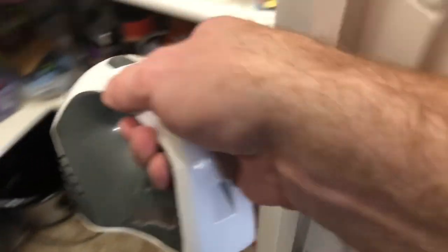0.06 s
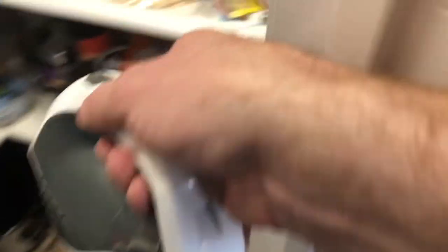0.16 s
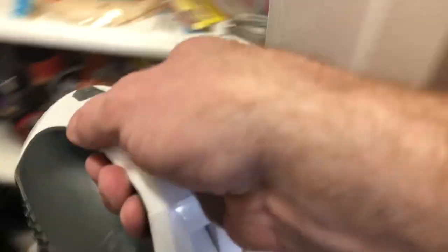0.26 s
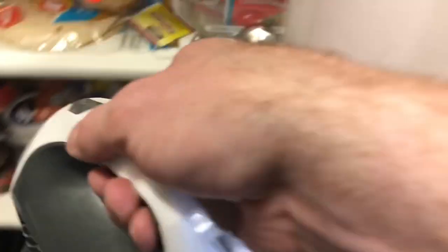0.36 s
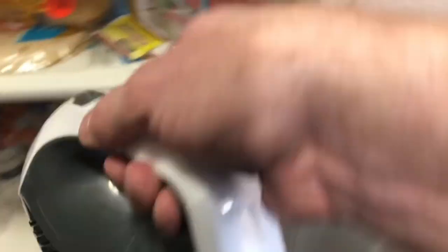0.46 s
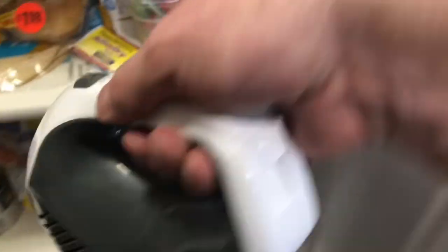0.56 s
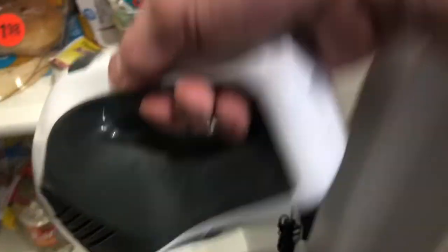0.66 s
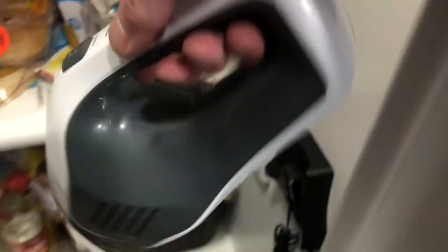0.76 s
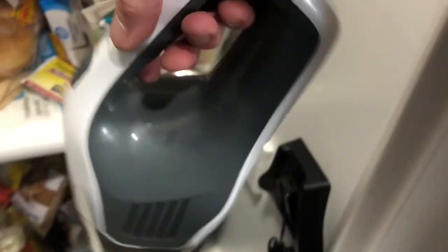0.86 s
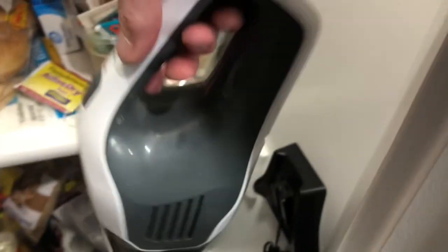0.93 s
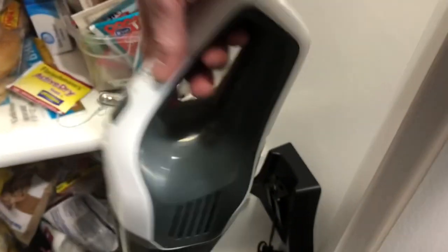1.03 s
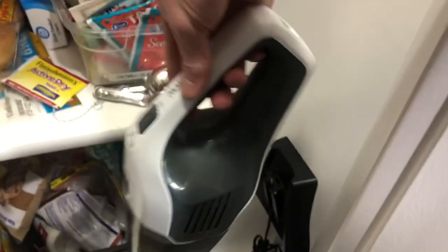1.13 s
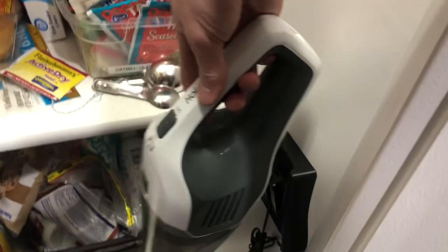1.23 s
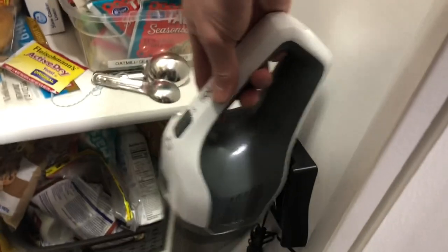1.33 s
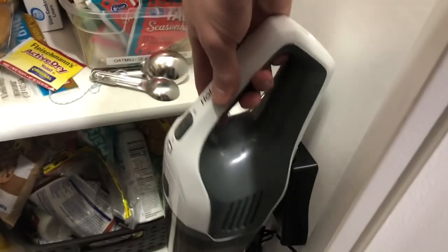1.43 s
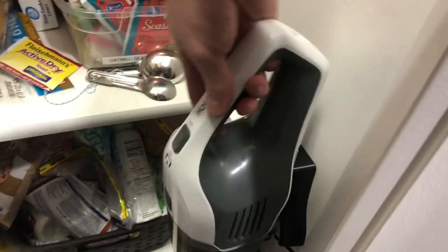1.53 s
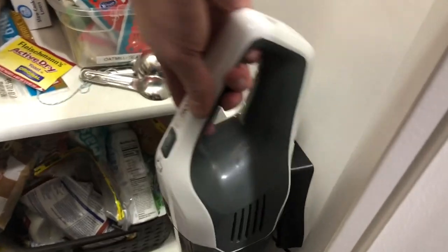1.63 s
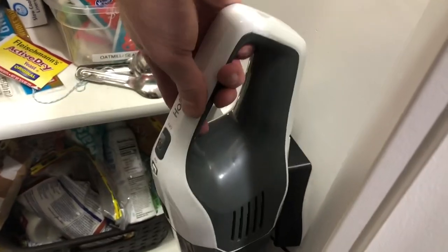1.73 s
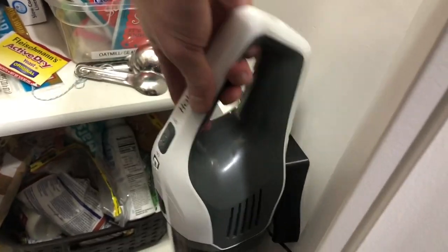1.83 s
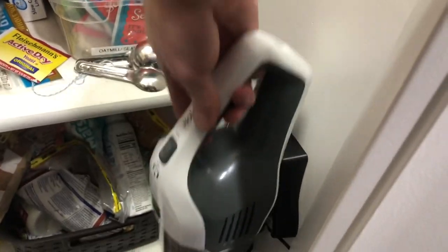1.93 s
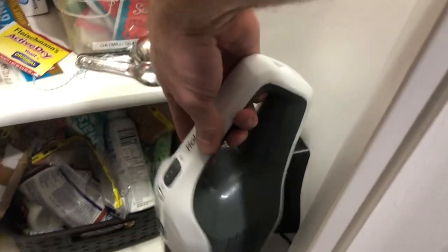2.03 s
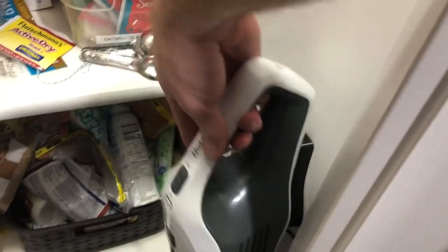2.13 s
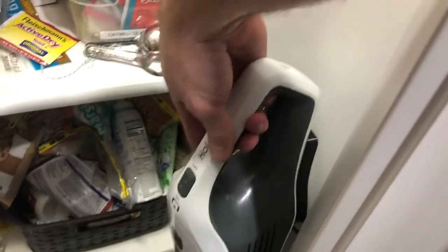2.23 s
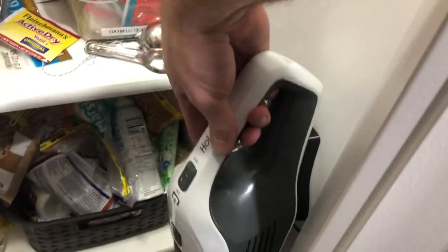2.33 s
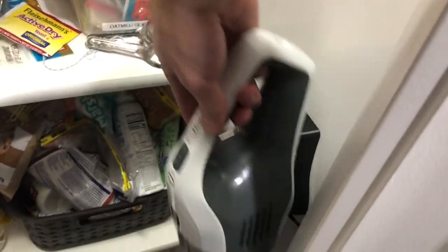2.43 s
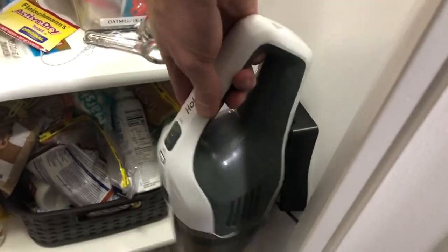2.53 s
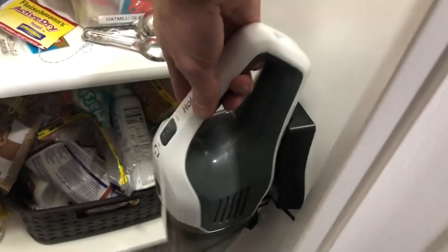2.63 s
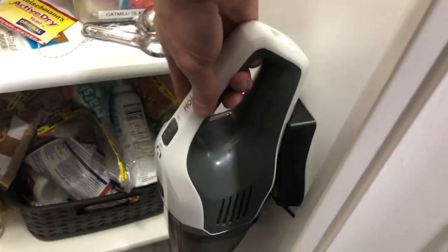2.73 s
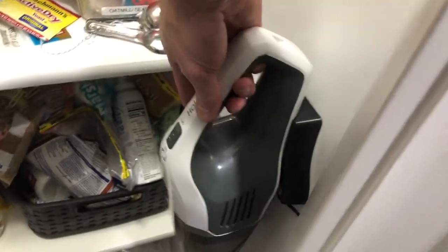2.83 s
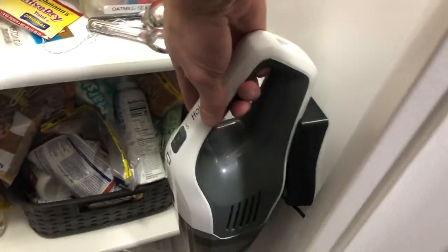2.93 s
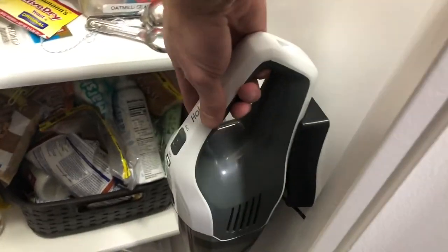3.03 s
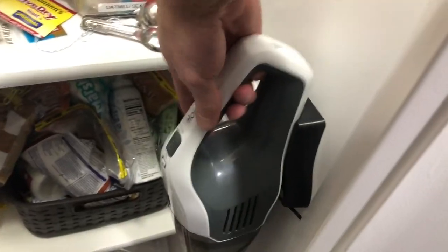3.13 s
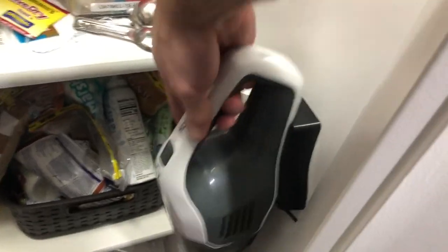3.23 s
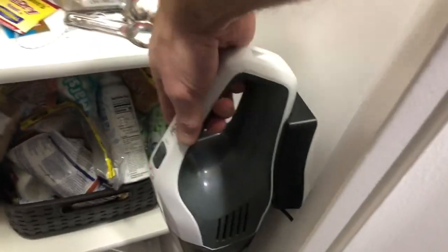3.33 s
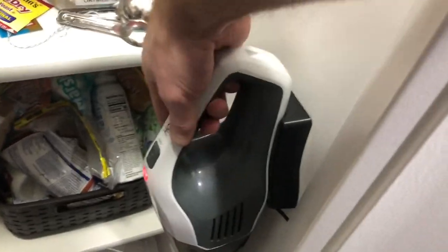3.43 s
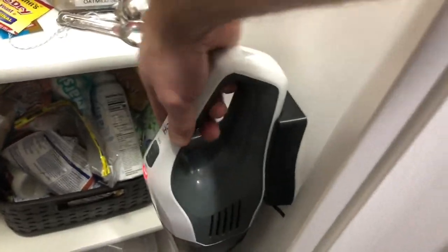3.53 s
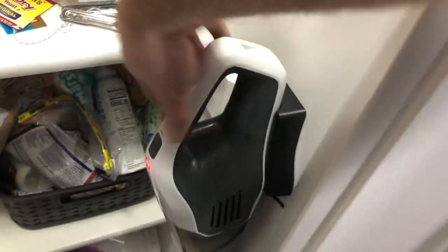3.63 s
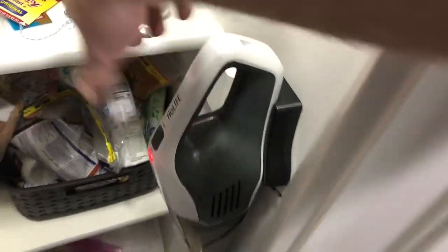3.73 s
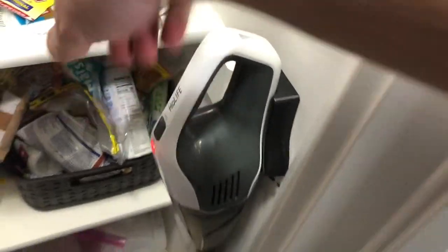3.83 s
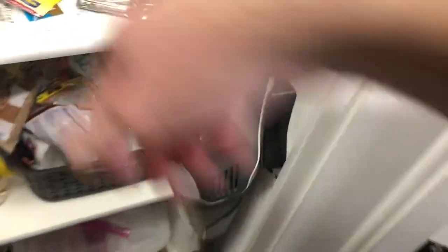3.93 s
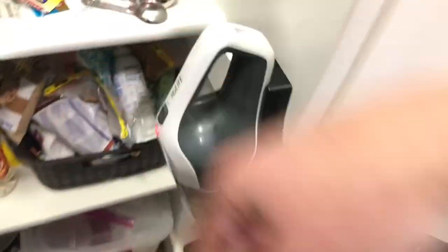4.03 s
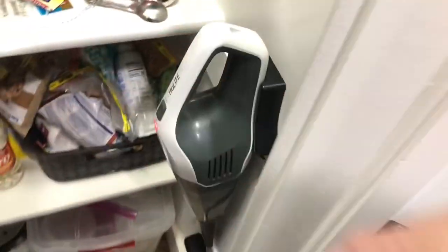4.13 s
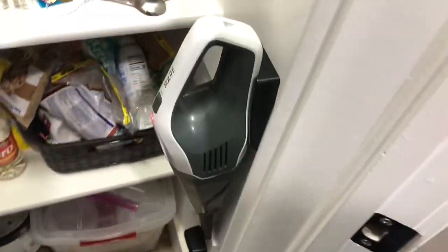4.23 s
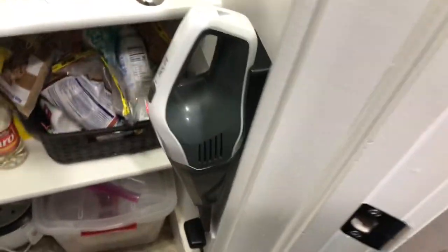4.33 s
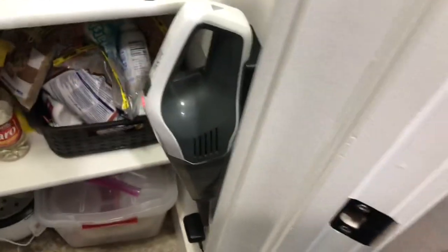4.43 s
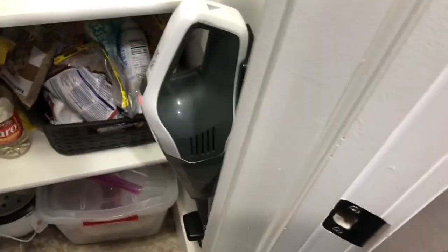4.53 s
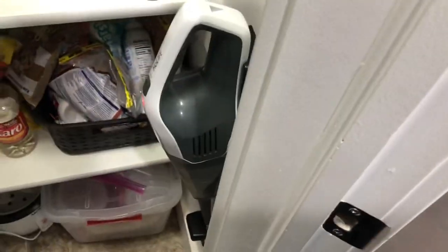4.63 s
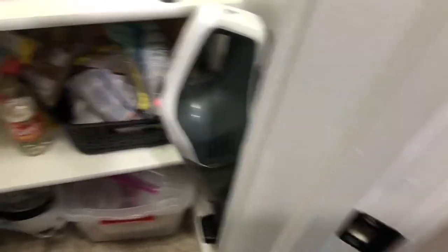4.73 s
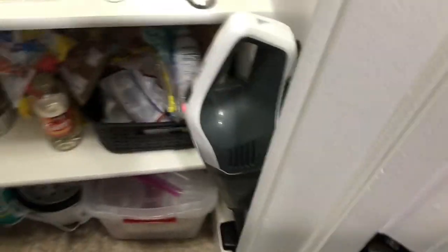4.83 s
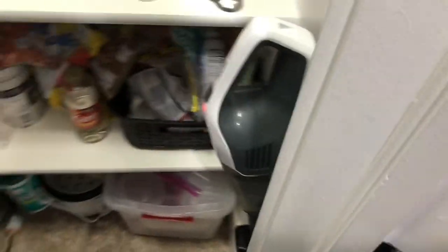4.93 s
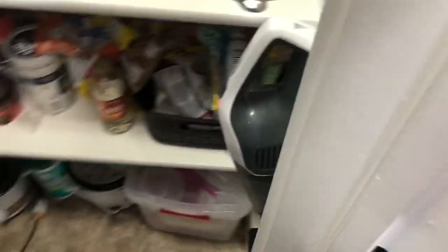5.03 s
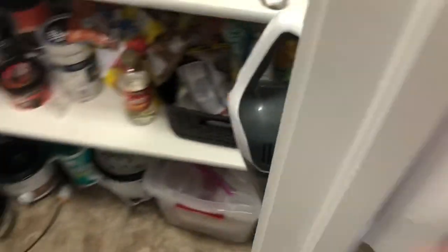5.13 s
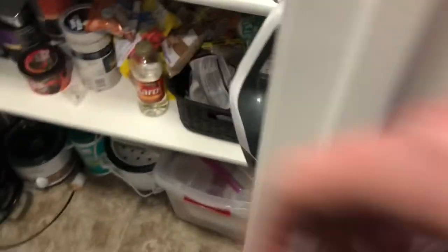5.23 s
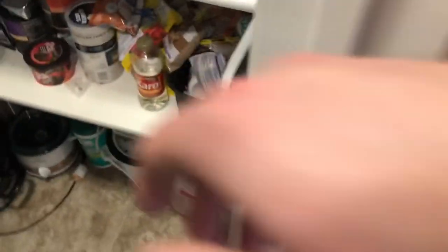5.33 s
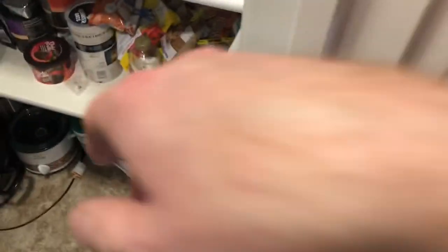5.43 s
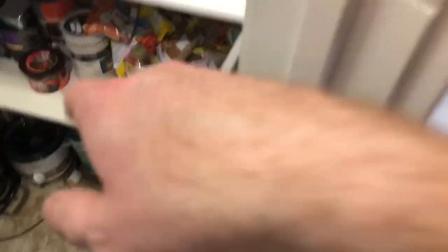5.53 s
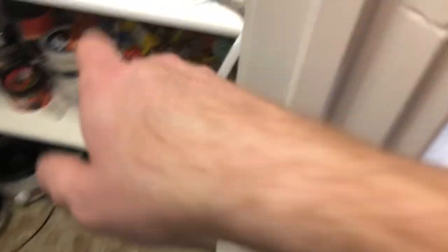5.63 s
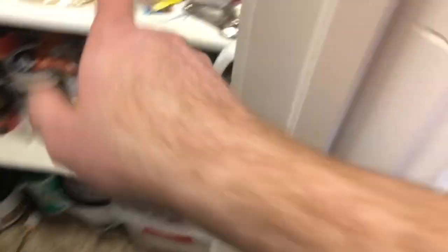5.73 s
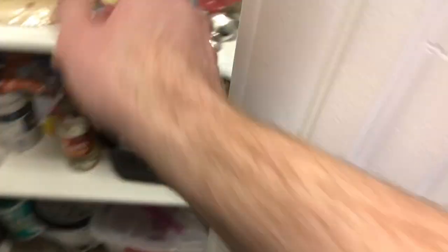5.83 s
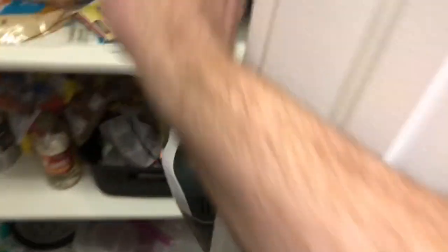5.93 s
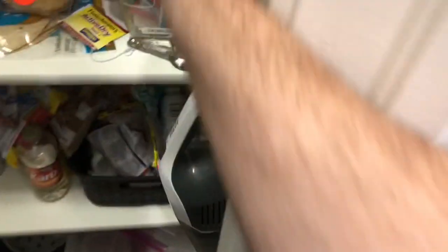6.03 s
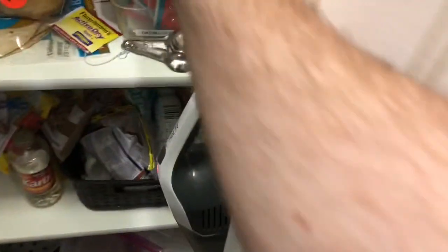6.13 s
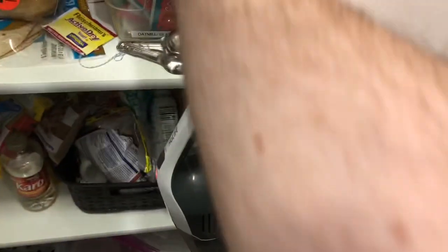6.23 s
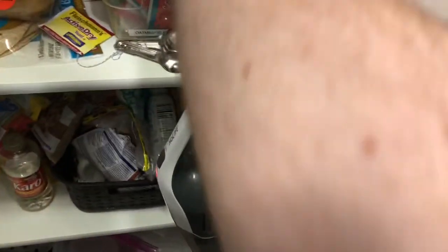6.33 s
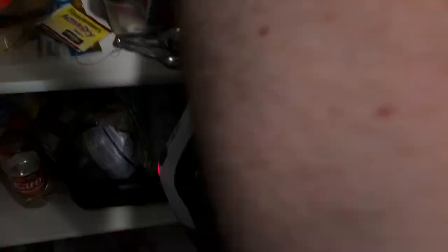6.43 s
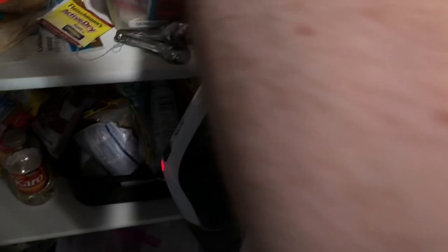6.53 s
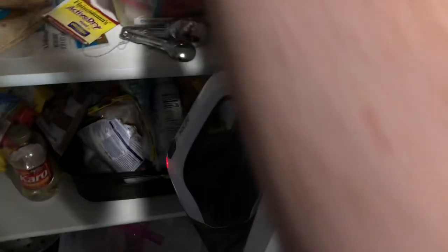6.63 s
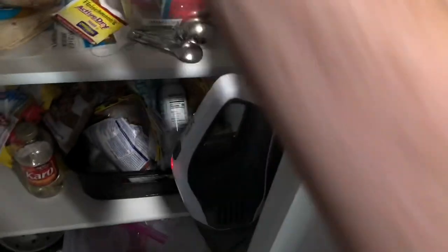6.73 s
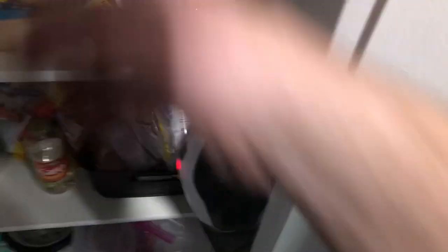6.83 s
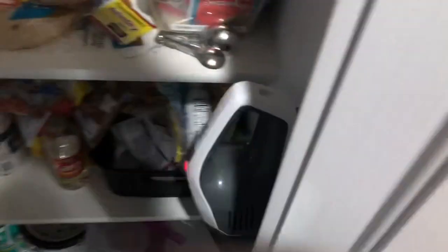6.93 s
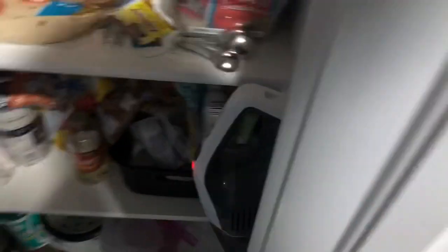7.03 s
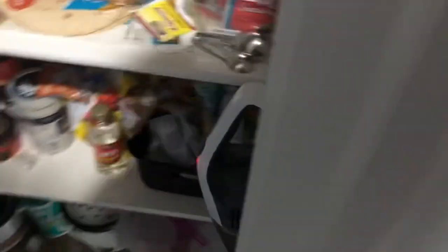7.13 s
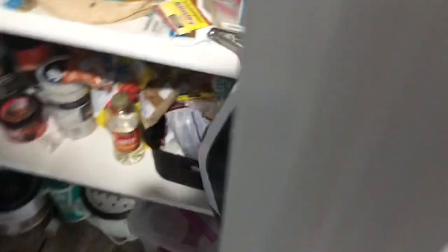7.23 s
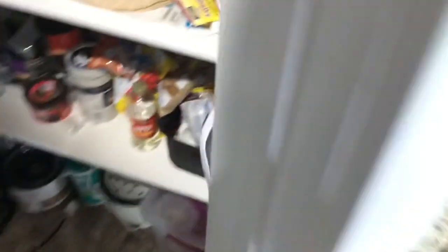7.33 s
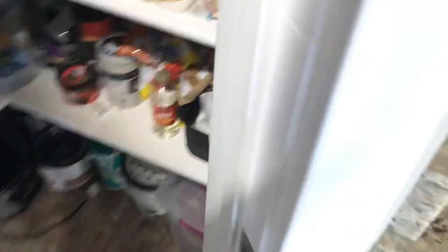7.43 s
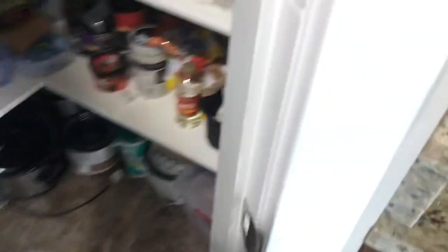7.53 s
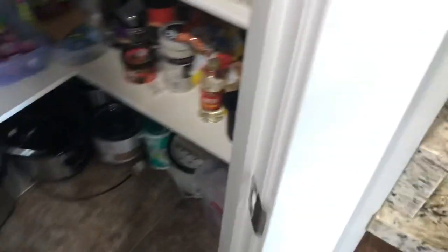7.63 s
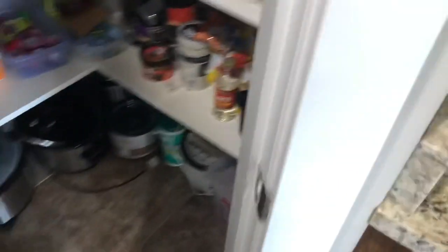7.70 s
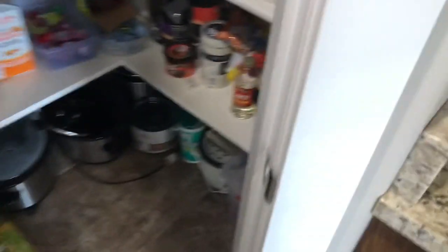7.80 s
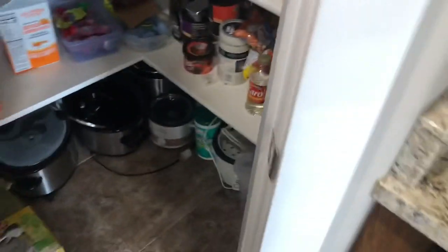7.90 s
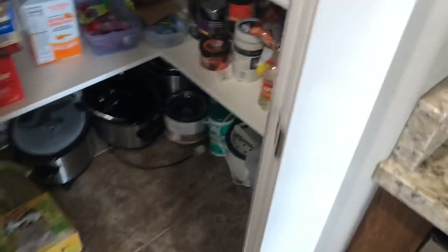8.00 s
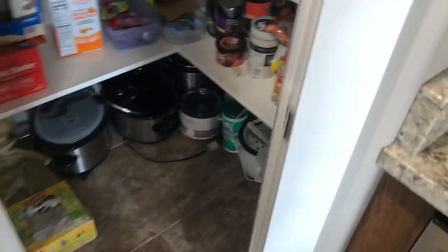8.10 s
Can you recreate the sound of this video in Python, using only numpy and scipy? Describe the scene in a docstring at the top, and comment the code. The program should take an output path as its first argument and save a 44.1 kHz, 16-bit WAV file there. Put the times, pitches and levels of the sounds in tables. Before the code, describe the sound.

In a small pantry with a faint low hum, a plastic appliance bumps and clacks into its holder; later soft footsteps and one switch click.

```python
"""A handheld vacuum is bumped against its plastic wall mount in a pantry, shuffled into place and snapped home:
decaying modes and noise bands form each contact, grains of noise the sliding, close modes the snap.
Soft steps and a light switch use the same contact model; clothes rustle as swelling bands of noise.
An appliance hums as one wavering tone over still air; decaying noise bands add the reverberation."""
import sys
import numpy as np
from scipy import signal
from scipy.fft import rfft, irfft
from scipy.io import wavfile
from scipy.ndimage import uniform_filter1d

SR = 44100
rng = np.random.default_rng(int(sys.argv[2]) if len(sys.argv) > 2 else 0)


def file_out(sig):
    """Save sig as 16-bit WAV at sys.argv[1]."""
    # one column per channel
    cols = np.atleast_2d(sig).T
    # limit, then scale
    lim = np.clip(cols, -1, 1)
    pcm = np.round(lim * 32767).astype(np.int16)
    wavfile.write(sys.argv[1], SR, pcm)


N = 359856
TIME = np.arange(N) / SR
EDGES = 32 * 2 ** np.arange(0, 9.4, 1 / 3)   # third-octave band limits, Hz
CENTRES = np.sqrt(EDGES[1:] * EDGES[:-1])

# All levels are relative, ahead of the mix; spectrum levels are per Hz, wash and room levels per octave.
# vacuum against its mount: t/s, level/dB, hollow body/dB and crack/dB relative to that level
VACUUM_KNOCKS = [(1.3495,-16,-11,-2.5), (1.3525,-15.5,-6.5,-9), (1.469,-25.5,-4,-12),
                 (1.476,-20.5,-21,-5.5), (1.5255,-27,-19,-10), (1.8425,-31.5,-22.5,-8.5),
                 (1.8945,-16,-12.5,-15.5), (1.9468,-12,-10.5,-25.5), (1.977,-7.5,-11.5,-6.5),
                 (1.983,-15,-6.5,-11.5), (2.001,-12,-8.5,-8.5), (2.0165,-10.5,-5,-5.5),
                 (2.024,-15,-11,-4.5), (2.036,-17,-8.5,-8), (2.119,-24.5,-6,-10), (2.153,0.5,-12,-7),
                 (2.178,-8,-19,-10.5), (2.3795,-27.5,-3,-6.5), (2.400,-29,-14,-23), (2.433,-19.5,-11,-11.5),
                 (2.4505,-43,-12,-1), (2.4585,-20,-7.5,-8), (2.5325,-16,-21.5,-12.5),
                 (2.5555,-16.5,-11.5,-12.5), (2.6535,-19,-8,-8.5), (2.671,-18.5,-5.5,-8),
                 (2.695,-23.5,-15,-13), (2.752,-30.5,-4,-8.5), (2.767,-33,-2.5,-11), (2.802,-33.5,-2,-6.5),
                 (2.8265,-34.5,-9.5,-7.5), (2.858,-37.5,-8,-11), (2.9711,-47.5,-13.5,-3.5),
                 (3.152,-26,-2,-1.5), (3.2138,-3,-9.5,-3), (3.226,-13.5,-15,-4), (3.243,-25,-16.5,4),
                 (3.2545,-24,-9,0.5), (3.2598,-8.5,-11.5,-6.5), (3.5748,-21.5,-7,-6), (3.599,-30,-9.5,-6)]
# modes of the shell with its mount: f/Hz, level/dB, t60/s
SHELL_MODES = [(155.1, -23, 0.63), (226, -12, 0.13), (252.3, -10.5, 0.064), (307, -9.5, 0.14),
               (372, -5, 0.135), (412.2, -4.5, 0.11), (444, -13, 0.16), (487.8, -3.5, 0.11),
               (588.7, -11.5, 0.0732), (870, -13, 0.16), (1012.4, -3, 0.063), (1247, -10, 0.03),
               (1297, -11, 0.072), (1670, -14.5, 0.057), (2595, -16, 0.057), (2940, -17, 0.032),
               (3270, -14.5, 0.058), (5293, -18, 0.045)]
# dense remaining modes of the shell: f/Hz, level/dB, t60/s
SHELL_WASH = [(35, -37.5, 0.11), (60, -26, 0.15), (119.8, -20.5, 0.22), (347, -7, 0.14), (685, -6, 0.092),
              (1210, -5, 0.054), (2020, -9, .06), (2750, -6.5, 0.057), (3800, -8.5, 0.054),
              (6900, -8.5, 0.08), (9300, -6, 0.062), (14700, -10.5, 0.011)]
# the vacuum drops into its seat and rebounds: t/s, level/dB
SEATINGS = [(3.2143, -7), (3.2608, -19)]
# modes of the loaded mount: f/Hz, level/dB, t60/s
MOUNT_MODES = [(170, -21, 0.092), (274, -7.5, 0.097), (397.7, -2, 0.065), (583, -6, 0.094), (783, -7, .04),
               (1020.5, 2, 0.03), (1215, -5.5, 0.06), (1290, -12.5, 0.03), (1680, -14, .04)]
# the blow that rings the mount's thin clip: t/s, level/dB
CLIP_SNAPS = [(2.1535, -23)]
CLIP_MODES = [(1374, 2, 0.072), (3910, 2, 0.023), (3820, 1, 0.037), (4600, 3, .03), (4660, 2, 0.03),
              (5350, 4.5, 0.035), (5450, -1, 0.024)]
# plastic sliding on plastic: start t/s, length/s, level/dB
SLIDES = [(1.496,0.15,-56), (1.775,0.34,-51), (2.396,0.13,-54.5), (2.506,0.42,-58.5), (2.695,0.18,-56),
          (2.891,0.1,-60.5), (3.102,0.12,-50.5), (3.477,0.11,-57.5)]
# colour of the sliding: f/Hz, level/dB
SLIDE_COLOUR = [(150, -13.5), (400, 7), (700, 1), (1050, -4), (1800, -11.5), (3500, -14.5), (8000, -22.5),
                (16000, -29.5)]
# blows after which loose plastic parts buzz: t/s, level/dB
RATTLES = [(2.175, -50)]
# blows that set the hollow wall booming: t/s, level/dB
WALL_BLOWS = [(1.35, -59), (1.981, -40), (2.03, -41.5), (2.16, -40), (2.53, -50), (2.67, -41.5),
              (3.22, -37.5)]
# blows that shake loose things on the shelf: t/s, level/dB
SHELF_JOLTS = [(2.153, -50), (3.215, -37)]
# fingers on the light switch and its flip: t/s, level/dB, body/dB, crack/dB
SWITCH_CONTACTS = [(6.234,-35.5,-13.5,-22), (6.326,-44.5,-3,-6.5), (6.395,-47.5,-13,-4.5),
                   (6.435,-15.5,-23.5,-11.5), (6.509,-46.5,-18,-12), (6.549,-42,-16.5,-15)]
# modes of the switch in its wall: f/Hz, level/dB, t60/s
SWITCH_MODES = [(357, 7, 0.091), (500, -6, 0.12), (950, 1.5, 0.022), (1420, -5.5, 0.03), (1522, 1, 0.023),
                (2817, 4.5, 0.026), (3210, -7, .03)]
# dense remaining modes of the switch: f/Hz, level/dB, t60/s
SWITCH_WASH = [(60, -25.5, 0.21), (368, -4.5, 0.21), (935, -17, 0.11), (2430, -18.5, 0.15),
               (2830, 0.5, 0.073), (3530, -6, 0.046), (4400, -5.5, 0.066), (5500, -6, 0.066),
               (8050, -0.5, 0.056), (15000, -15, 0.077)]
# the switch's spring as the finger loads it and lets go: t/s, level/dB
SPRING_PLUCKS = [(6.235, -45), (6.288, -54), (6.538, -51.5)]
# soft steps on the floor: t/s, level/dB, body/dB, crack/dB
STEPS = [(0.103,-43.5,7.5,-18), (0.803,-43,-5.5,-15), (4.2,-40,-1,-12), (4.22,-48.5,8,-17),
         (4.814,-54.5,6,-28), (4.931,-23,-4,-26), (4.944,-42,-15,3.5), (5.118,-36.5,-6.5,-17),
         (5.437,-35,-5,-13), (5.572,-36,-11.5,-12), (6.931,-38.5,-1,-6), (7.748,-26,-8.5,-16),
         (7.784,-29,-15,-16), (7.858,-33,-12.5,-22.5)]
# modes of the floor: f/Hz, level/dB, t60/s
FLOOR_MODES = [(80, -32, 0.29), (286, -7.5, 0.04), (384, -3.5, 0.021), (446, -21, 0.095)]
# dense remaining modes of the floor: f/Hz, level/dB, t60/s
FLOOR_WASH = [(39.5, -61, 0.08), (130, -13, 0.11), (477, -3, 0.04), (1220, -16.5, 0.068),
              (3000, -23, 0.035), (15100, -22, 0.044)]
# tiny dry ticks: t/s, level/dB, body/dB, crack/dB
TICKS = [(0.7554,-47,-18,-6), (0.8278,-46,-27,-5), (0.9657,-56.5,-11,-5), (5.7244,-58.5,-11,0.5)]
# dense modes of the ticks: f/Hz, level/dB, t60/s
TICK_WASH = [(200, -27, .02), (1400, 0, 0.013), (2880, 9, 0.0081), (6000, 6, 0.006), (15000, -1, 0.018)]
# a faint clink of something loose: t/s, level/dB
CLINKS = [(5.687, -52.5)]
# modes of the clink: f/Hz, level/dB, t60/s
CLINK_MODES = [(3470, -1, 0.041), (4800, -3, 0.034)]
# strokes of sleeves and soles: start t/s, swell/s, length/s, swish level/dB, hiss level/dB
BRUSHES = [(0.08,0.044,0.25,-85,-58.5), (0.391,0.044,0.39,-57,-59), (0.528,0.037,0.14,-63,-73),
           (0.7,0.039,0.43,-67.5,-64), (3.649,0.056,0.081,-69,-55.5), (4.089,0.065,0.17,-58,-59),
           (4.63,0.029,0.11,-58.5,-70), (4.919,0.087,0.21,-58.5,-63), (5.177,0.041,0.091,-68,-56.5),
           (5.437,0.0053,0.23,-49,-49), (5.794,0.17,0.37,-57.5,-60), (5.983,0.09,0.52,-63,-58),
           (6.921,0.07,0.18,-66,-67.5), (7.278,0.057,0.083,-53,-48.5), (7.704,0.093,0.4,-65,-64.5),
           (8.067,0.062,0.19,-54.5,-53.5)]
# colour of the lower swish: f/Hz, level/dB
SWISH_COLOUR = [(300, -4), (700, -1.5), (1500, -5.5), (3300, -2), (4500, -6), (6500, -20.5)]
# colour of the higher hiss: f/Hz, level/dB
HISS_COLOUR = [(3000, 0), (4800, 6), (7000, 3), (10000, -2), (16000, -8.5)]
# cloth whose pitch follows the speed of the rub: start t/s, length/s, first f/Hz, last f/Hz, level/dB
RUBS = [(0.406, 0.17, 4316, 3593, -60.5), (0.503, 0.19, 2366, 1677, -59.5), (0.816, 0.31, 4230, 6340, -74),
        (5.947, 0.4, 3970, 6810, -65)]
# the pantry's reverberation: f/Hz, level/dB, t60/s
ROOM = [(59.7, -26.5, 0.51), (200, -38, 0.27), (500, -38.5, 0.57), (1200, -29.5, 0.44), (2565, -34.5, 0.5),
        (5026, -32.5, 0.44), (8000, -35, 0.34), (15000, -35.5, .25)]
# course of the hum at the listener: t/s, level/dB
HUM_LEVEL = [(0,-57), (1.05,-64), (2.9,-61), (4.1,-65.5), (5.3,-55.5), (6.6,-61), (7.2,-56.5), (8.16,-58)]
# colour of the still air: f/Hz, level/dB
AIR_COLOUR = [(25, -7.5), (60, -5.5), (130, -2.5), (200, 1), (310, -3.5), (550, -5.5), (700, -10.5),
              (1000, -14.5), (2300, -21), (8000, -25.5), (16000, -33.5)]

SNAP_PER_CRACK, SNAP_DB = 2.02, -2.5   # a harder contact gains faster still in the top octave
SLIDE_ATTACK_S, SLIDE_RELEASE_S = 0.032, 0.045   # each push gathers speed and comes to rest
RUB_WIDTH_HZ, RUB_EDGE_S = 960, 0.084   # width to either side of the gliding pitch
# the door frame's echo of the moving arm: mean delay, spread of the delay, level
FRAME_ECHO_S, FRAME_SWAY_S, FRAME_ECHO_DB = 0.00112, 0.00014, -11.5
HUM_HZ, AIR_DB, CUTOFF_HZ = 209.8, -64, 16200


def vacuum_knocks(bands):
    """Impact excitation: hard plastic rings the shell's modes, and a nearby surface returns an echo."""
    knocks = blows(VACUUM_KNOCKS, SHELL_MODES, SHELL_WASH, bands, rise_s=0.0003, crack=0.55,
                   scatter_db=1.5, alike=0.35, detune=0.0098)
    return near_wall(from_db(-13.0) * knocks, echo_s=0.003, echo_db=-23.5)


def blows(events, modes, wash, bands, rise_s, crack, scatter_db=2, alike=.5, detune=0, size=16000):
    """Modal superposition: a contact rings clear and dense modes, coloured by how hard it lands."""
    out, t = np.zeros(N + size), np.arange(size) / SR
    wash_db, wash_t60 = at_hz(wash, CENTRES)
    # a brief crack tops the decay; low modes take part of a cycle to build up
    fade = from_db(-60 * t / wash_t60[:, None])
    fade = fade * (1 + crack * np.exp(-t / 0.0024))
    fade = fade * (1 - np.exp(-t * CENTRES[:, None] / 1.2))
    energy = np.sum(fade ** 2, axis=1)
    hz, mode_db, t60 = np.reshape(modes, (-1, 3)).T
    rings = from_db(-60 * t / t60[:, None])
    rings = rings * (1 - np.exp(-t * hz[:, None] / 0.38))
    for s, peak_db, body_db, crack_db in events:
        snap_db = SNAP_DB + SNAP_PER_CRACK * crack_db
        colour = [(450, body_db + 10.0), (1100, 0.00064), (3500, crack_db + 9.5), (9000, snap_db + 6.5)]
        # the wash is partly the object's own, partly new with each contact
        start = rng.integers(size, bands.shape[1] - size)
        fresh = bands[:, start:start + size]
        dense = (alike * bands[:, :size] + (1 - alike) * fresh) * fade
        # three bands share the energy of an octave
        even_energy = np.sqrt(energy / np.sum(dense ** 2, axis=1) / 3)
        dense_gain = from_db(wash_db + at_hz(colour, CENTRES)[0]) * even_energy
        # the point of contact decides how much of each mode is struck
        dense_gain = dense_gain * from_db(scatter_db * rng.standard_normal(len(CENTRES)))
        strength = from_db(mode_db + at_hz(colour, hz)[0] + scatter_db * rng.standard_normal(len(hz)))
        # grip and pressure shift the modes a little from contact to contact
        shifted_hz = hz * (1 + detune * rng.standard_normal(len(hz)))
        cycles = shifted_hz[:, None] * t + rng.random((len(hz), 1))
        clear = strength @ (rings * np.sin(2 * np.pi * cycles))
        at = round(s * SR)
        onset = 1 - np.exp(-t / rise_s)
        out[at:at + size] += from_db(peak_db) * (dense_gain @ dense + clear) * onset
    return out[:N]


def mount_ring():
    """Free vibration: the snap rings the thin clip, and the seating rings the loaded mount."""
    return ringing(CLIP_SNAPS, CLIP_MODES) + ringing(SEATINGS, MOUNT_MODES)


def ringing(strikes, modes):
    """Damped oscillation: a stiff part rings in a few clean modes that each take time to build up."""
    out, t, tone = np.zeros(N + SR), TIME[:SR], 0
    for hz, db, t60 in modes:
        build_up = 1 - np.exp(-(2 * hz * t) ** 2)
        tone = tone + from_db(db - 60 * t / t60) * np.sin(2 * np.pi * hz * t) * build_up
    for s, level_db in strikes:
        at = round(s * SR)
        out[at:at + SR] += from_db(level_db) * tone
    return signal.sosfilt(signal.butter(2, 140, "high", fs=SR, output="sos"), out[:N])


def slide(grains_per_s, grain_db):
    """Stick-slip friction: with each push, plastic catches and slips in tiny uneven grains."""
    pushes = 0
    for start, length, db in SLIDES:
        pushes = pushes + from_db(db) * stroke(TIME - start, SLIDE_ATTACK_S, length, SLIDE_RELEASE_S)
    slips = (rng.random(N) < grains_per_s / SR) * from_db(grain_db * rng.uniform(-0.969, 1, N))
    # each grain decays over 5.1 ms
    grains = signal.lfilter([1], [1, -np.exp(-1 / (0.0051 * SR))], slips + 1e-9)
    return pushes * rms_one(grains * noise(SLIDE_COLOUR))


def rattle():
    """Amplitude modulation: loose parts buzz as a wide decaying band of unsteady level."""
    buzz = afterring(RATTLES, hz=3800, width_hz=2200, t60=0.4, rise_s=.005)
    return buzz * from_db(1.7 * drift(150))


def wall_boom():
    """Panel resonance: blows leave the hollow wall booming in a narrow low band."""
    return afterring(WALL_BLOWS, hz=83.5, width_hz=20, t60=0.53, rise_s=0.02)


def shelf_shake():
    """Structure-borne excitation: jolts shake loose things on the shelf in a wide middle band."""
    return afterring(SHELF_JOLTS, hz=1170, width_hz=750, t60=0.5, rise_s=.006)


def afterring(jolts, hz, width_hz, t60, rise_s):
    """Modal beating: narrow-band noise stands for close modes that beat as they die away."""
    envelope = np.zeros(N)
    for s, level_db in jolts:
        t = np.maximum(TIME - s, 0)
        envelope += from_db(level_db - 60 * t / t60) * (1 - np.exp(-t / rise_s))
    offset = (np.fft.rfftfreq(N, 1 / SR) - hz) / width_hz
    cluster = irfft(rfft(rng.standard_normal(N)) / (1 + (2 * offset) ** 2), N)
    power = uniform_filter1d(cluster ** 2, size=4000)
    return envelope * cluster / np.sqrt(power + 1e-12)


def light_switch(bands):
    """Impact excitation: fingers and the flip ring the switch in its wall."""
    return from_db(-7.0) * blows(SWITCH_CONTACTS, SWITCH_MODES, SWITCH_WASH, bands, rise_s=0.0014,
                                 crack=1.7, scatter_db=2.0, alike=0.47, detune=0.018)


def switch_spring():
    """Spring resonance: the switch's spring sings in a band that dies quickly."""
    return afterring(SPRING_PLUCKS, hz=1464, width_hz=300, t60=0.11, rise_s=0.00089)


def footsteps(bands):
    """Soft impact: a slower contact rings the floor's modes."""
    return from_db(-8.0) * blows(STEPS, FLOOR_MODES, FLOOR_WASH, bands, rise_s=0.0018, crack=0.85)


def dry_ticks(bands):
    """Heavily damped impact: dense modes die at once and no clear mode sounds."""
    return from_db(-2.0) * blows(TICKS, [], TICK_WASH, bands, rise_s=0.001, crack=0.93, scatter_db=2.5)


def clothes():
    """Friction noise: rough strokes and rubs flutter through the folds, with a frame's echo."""
    # the weave catches and lets go, which roughens each stroke
    cloth = rustle(sag_db=14.0, stop_s=0.09, flutter_db=0.37) * from_db(1.1 * drift(500))
    cloth = folds(cloth + rubs(), patchy_db=4.0, per_s=30)
    return near_wall(cloth, FRAME_ECHO_S + FRAME_SWAY_S * drift(0.89), FRAME_ECHO_DB)


def rustle(sag_db, stop_s, flutter_db):
    """Speed-dependent friction: each stroke swells, sags as it slows, and stops."""
    swish_power, hiss_power = np.zeros(N), np.zeros(N)
    for start, swell, length, swish_db, hiss_db in BRUSHES:
        t = TIME - start
        sag = from_db(-sag_db * np.clip((t - swell) / length, 0, 1))
        speed = stroke(t, swell, length, stop_s) * sag
        swish_power += (speed * from_db(swish_db)) ** 2
        hiss_power += (speed * from_db(hiss_db)) ** 2
    swish = np.sqrt(swish_power) * noise(SWISH_COLOUR)
    hiss = np.sqrt(hiss_power) * noise(HISS_COLOUR)
    return from_db(flutter_db * drift(66)) * (swish + hiss)


def rubs():
    """Periodic friction: threads slip over threads in a narrow band that glides with the arm's speed."""
    level, pitch = np.zeros(N), np.zeros(N)
    for start, length, first_hz, last_hz, db in RUBS:
        level += from_db(db) * stroke(TIME - start, RUB_EDGE_S, length, RUB_EDGE_S)
        glide = np.interp(TIME, [start, start + length], [first_hz, last_hz])
        pitch = np.where(TIME >= start, glide, pitch)
    low_pass = signal.butter(2, RUB_WIDTH_HZ, fs=SR, output="sos")
    slips = signal.sosfilt(low_pass, rng.standard_normal(N))
    # a gliding carrier moves the low noise up to the pitch
    return level * rms_one(slips * np.sin(2 * np.pi * np.cumsum(pitch) / SR))


def folds(x, patchy_db, per_s, count=6):
    """Band-wise modulation: as folds shift, each band below the topmost flutters on its own."""
    out = 0
    splits_hz = 400 * 2 ** np.arange(count)
    for split_hz, chance in zip(splits_hz, rng.standard_normal((count, 1000))):
        low = signal.sosfiltfilt(signal.butter(2, split_hz, fs=SR, output="sos"), x)
        out = out + low * from_db(patchy_db * np.interp(TIME * per_s, np.arange(len(chance)), chance))
        x = x - low
    return out + x


def near_wall(x, echo_s, echo_db):
    """Comb filtering: a nearby surface throws the sound straight back and combs its colour."""
    return x + from_db(echo_db) * np.interp(TIME - echo_s, TIME, x)


def pantry(x, bands, build_s):
    """Diffuse reverberation: convolution with a tail that builds quickly, each band with its own decay."""
    t = TIME[:SR]
    level_db, t60 = at_hz(ROOM, CENTRES)
    tails = bands[:, :SR] * from_db(-60 * t / t60[:, None]) * (1 - np.exp(-t / build_s))
    # three bands share the energy of an octave
    tails = tails / np.sqrt(3 * np.sum(tails ** 2, axis=1, keepdims=True))
    return signal.fftconvolve(x, from_db(level_db) @ tails)[:N]


def hum(waver_db, wander_rad):
    """Tonal radiation: one wavering low tone, louder and softer from place to place in the room."""
    phase = 2 * np.pi * HUM_HZ * TIME + wander_rad * drift(3.5)
    level = from_db(in_time(HUM_LEVEL)[0] + waver_db * drift(22))
    return np.sqrt(2) * level * np.sin(phase)


def still_air():
    """Stationary random noise: a steady, mostly low murmur."""
    return from_db(AIR_DB) * noise(AIR_COLOUR)


def stroke(t, attack_s, length_s, release_s):
    """Kinematic envelope: a movement gathers speed, holds and comes to rest."""
    return np.clip(t / attack_s, 0, 1) * np.clip((length_s - t) / release_s, 0, 1)


def noise(spectrum):
    """Spectral shaping: steady noise of a given colour, rms 1."""
    hz = np.maximum(np.fft.rfftfreq(N, 1 / SR), 1)
    low_skirt = 1 + (spectrum[0][0] / 2 / hz) ** 4
    high_skirt = 1 + (hz / 2 / spectrum[-1][0]) ** 8
    gain = from_db(at_hz(spectrum, hz)[0]) / np.sqrt(low_skirt * high_skirt)
    return rms_one(irfft(rfft(rng.standard_normal(N)) * gain, N))


def noise_bands(size):
    """Band filtering: third-octave bands of unrelated noise, rms 1 each."""
    bands = []
    for pair in zip(EDGES, EDGES[1:]):
        sos = signal.butter(2, pair, "band", fs=SR, output="sos")
        # the first half second lets the filter settle
        settled = signal.sosfilt(sos, rng.standard_normal(size + SR // 2))[SR // 2:]
        bands.append(rms_one(settled))
    return np.array(bands)


def drift(per_s):
    """Low-pass random process: smooth chance, rms 1, with its corner at per_s Hz."""
    hz = np.fft.rfftfreq(N, 1 / SR)
    return rms_one(irfft(rfft(rng.standard_normal(N)) / (1 + (hz / per_s) ** 2), N))


def from_db(db):
    """Logarithmic level: decibels to amplitude gain."""
    return 10 ** (np.asarray(db) / 20)


def rms_one(x):
    """Effective value: scale to an rms of one."""
    return x / np.sqrt(np.mean(x ** 2) + 1e-20)


def in_time(rows):
    """Linear interpolation: each column of a curve at every sample."""
    s, *columns = np.transpose(rows)
    return [np.interp(TIME, s, c) for c in columns]


def at_hz(rows, hz):
    """Logarithmic frequency scale: each column of a spectrum at the given frequencies."""
    points, *columns = np.transpose(rows)
    return [np.interp(np.log(hz), np.log(points), c) for c in columns]


def scene():
    """Superposition: all contacts sound in the pantry, with cloth, hum and still air."""
    bands = noise_bands(size=70000)
    vacuum = vacuum_knocks(bands) + mount_ring() + slide(grains_per_s=1800, grain_db=8.5) + rattle()
    switch = light_switch(bands) + switch_spring()
    steps = footsteps(bands)
    small_sounds = dry_ticks(bands) + ringing(CLINKS, CLINK_MODES)
    contacts = vacuum + switch + steps + small_sounds
    cloth = clothes()
    # the feet are farther away, so more of them comes by way of the walls
    room = pantry(contacts + from_db(12.0) * steps + cloth, bands, build_s=0.0077)
    background = hum(waver_db=1.2, wander_rad=.45) + still_air()
    return (contacts + wall_boom() + shelf_shake() + cloth + room + background)[None]


def record(dry):
    """Saturation and band limiting: the highest peaks are rounded and the top is cut."""
    rounded = 0.95 * np.tanh(dry / 0.88)
    return signal.sosfilt(signal.ellip(10, .2, 80, CUTOFF_HZ, fs=SR, output="sos"), rounded)


dry = scene()
out = record(dry)
file_out(out)
```